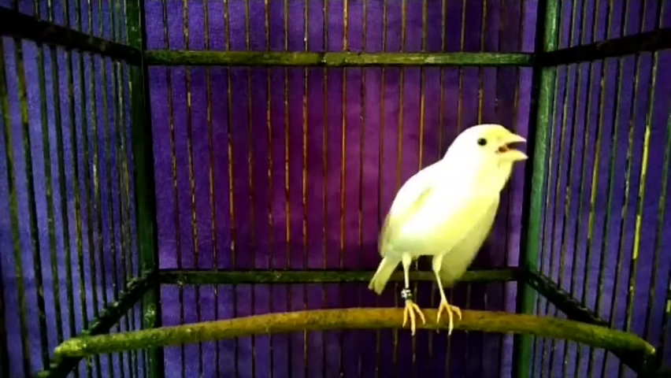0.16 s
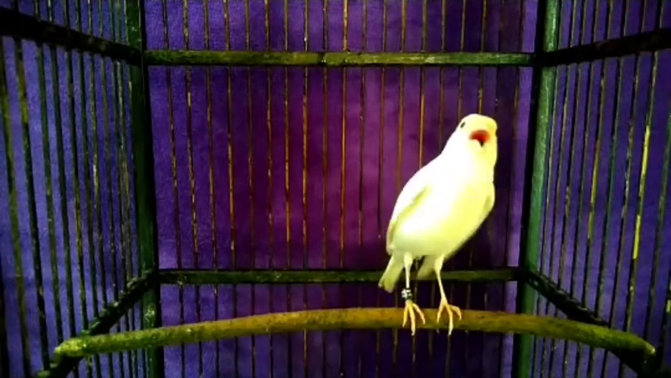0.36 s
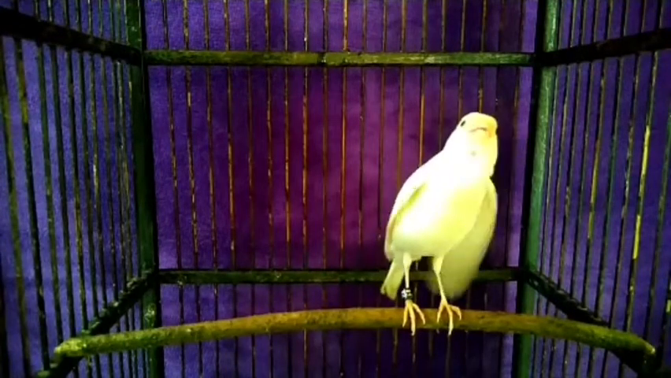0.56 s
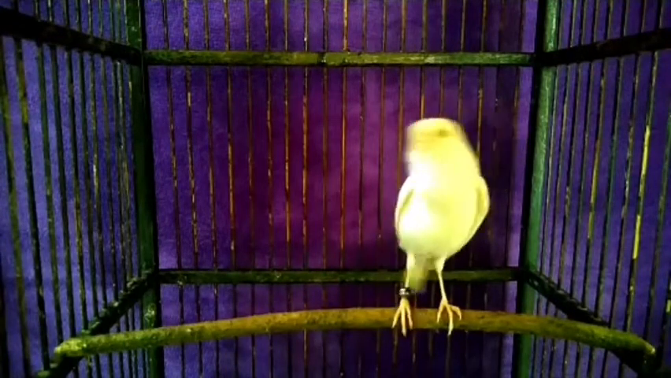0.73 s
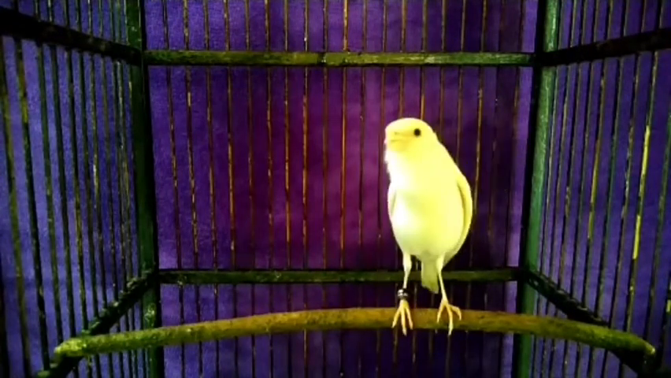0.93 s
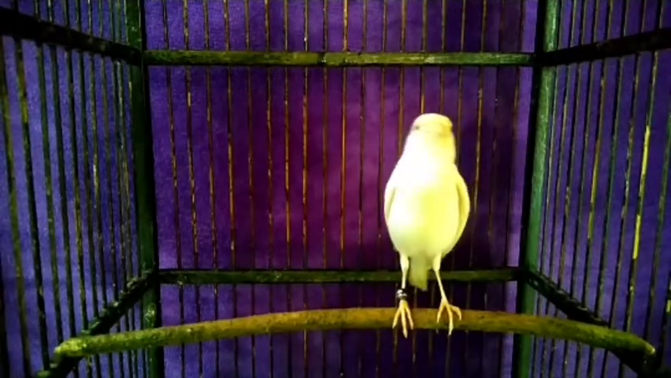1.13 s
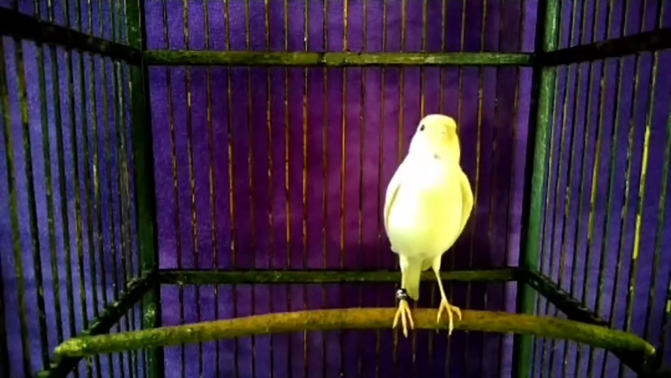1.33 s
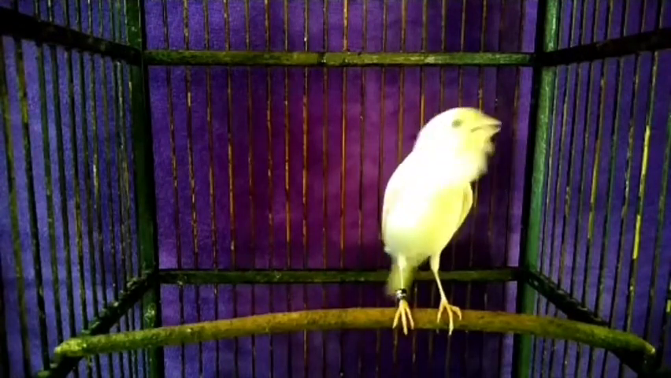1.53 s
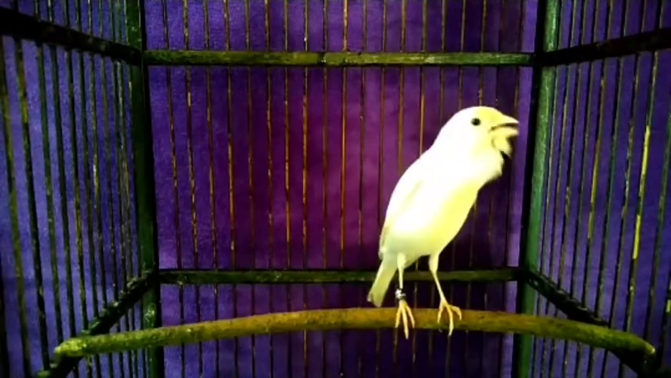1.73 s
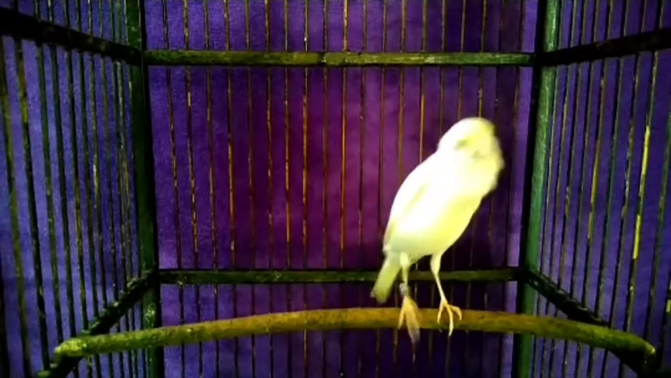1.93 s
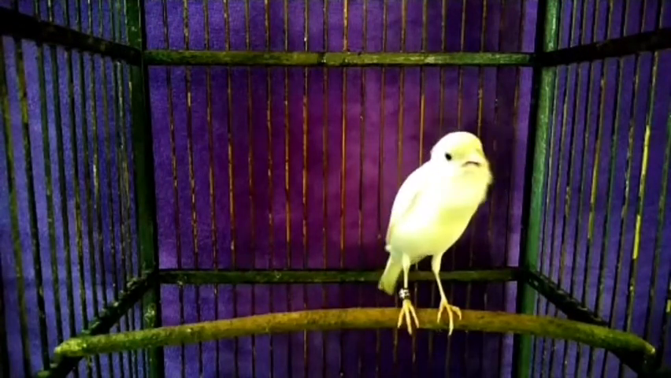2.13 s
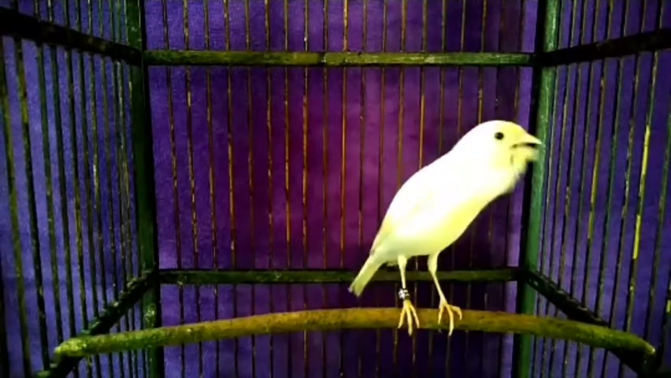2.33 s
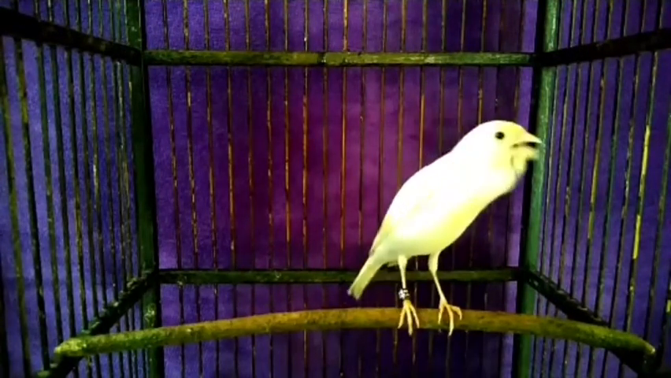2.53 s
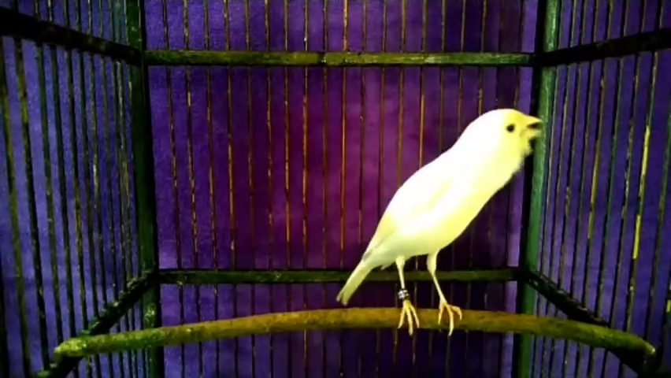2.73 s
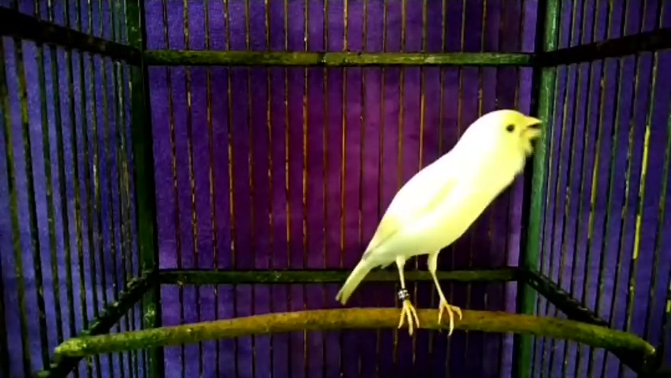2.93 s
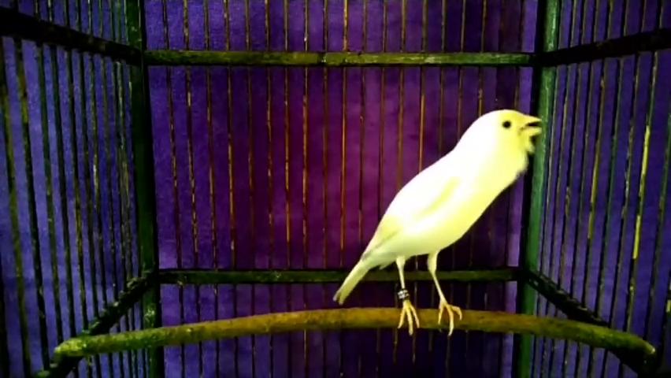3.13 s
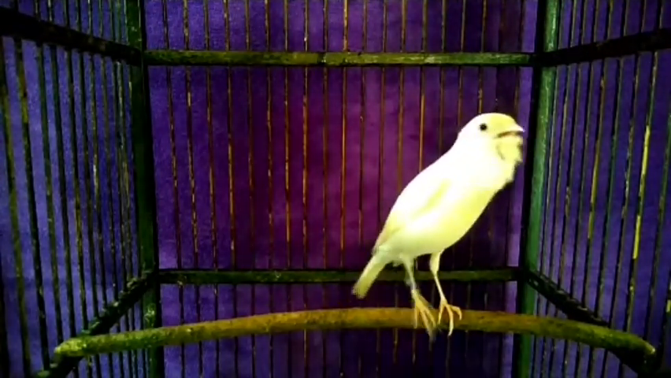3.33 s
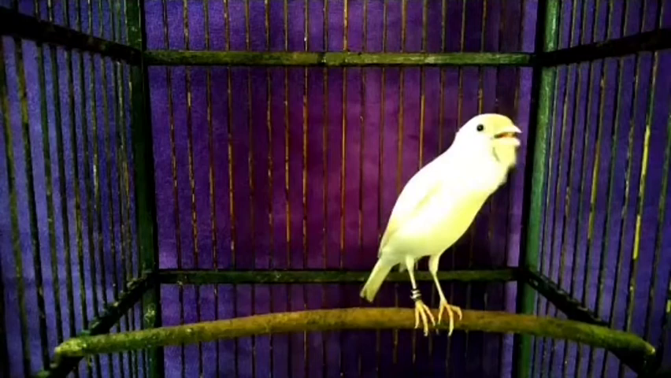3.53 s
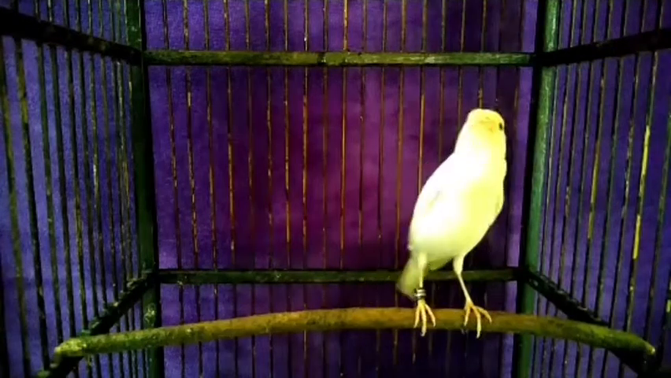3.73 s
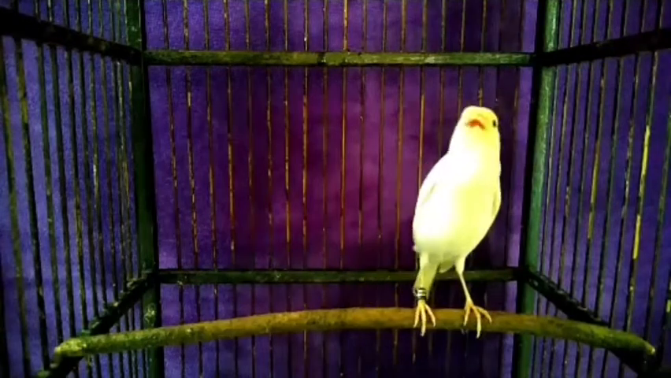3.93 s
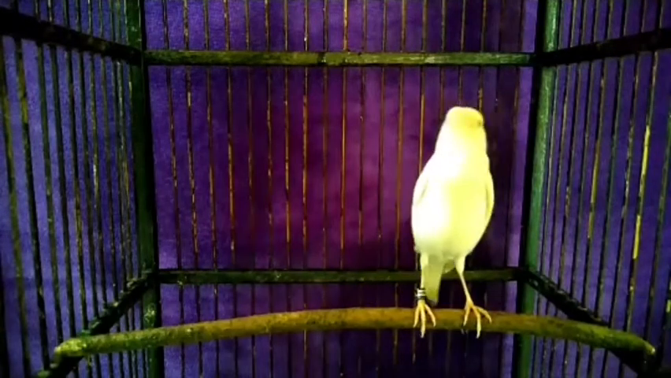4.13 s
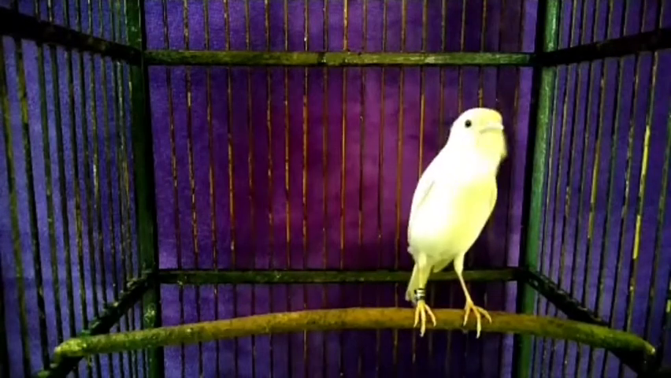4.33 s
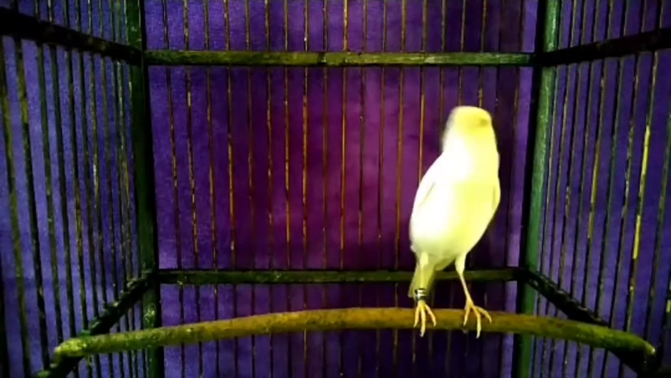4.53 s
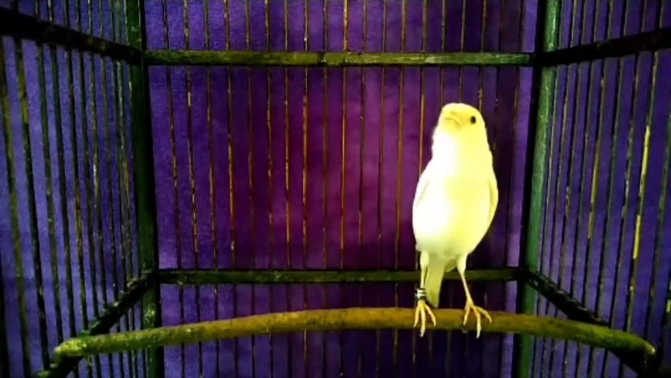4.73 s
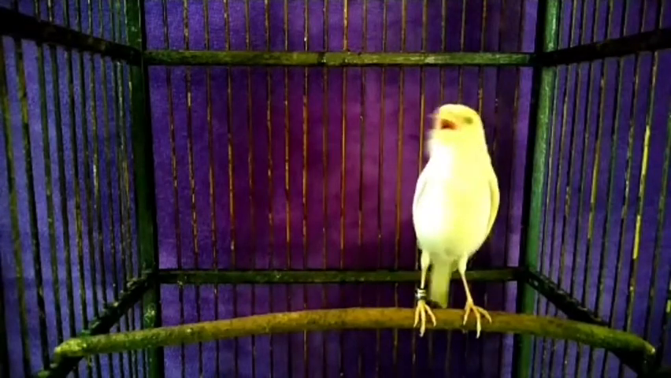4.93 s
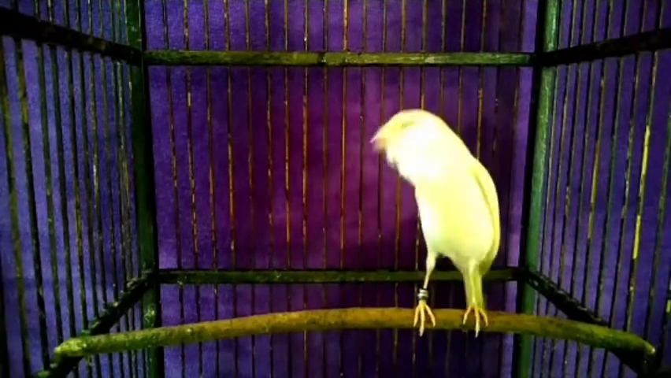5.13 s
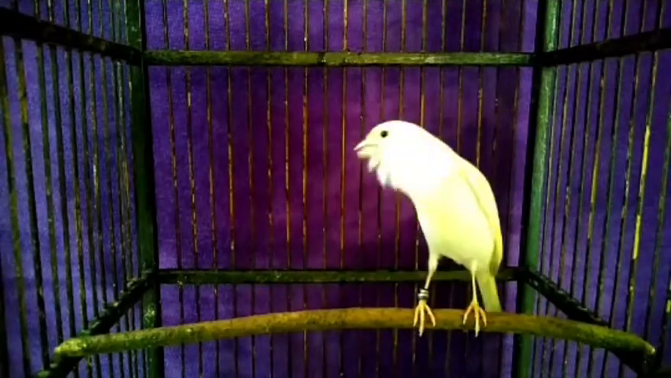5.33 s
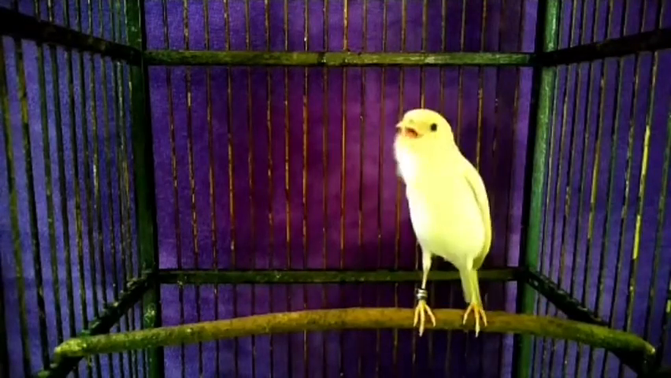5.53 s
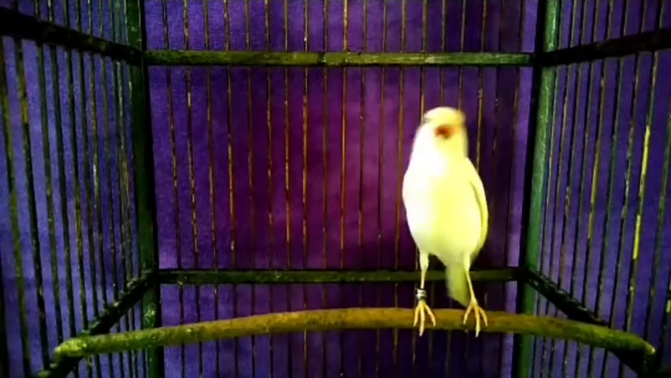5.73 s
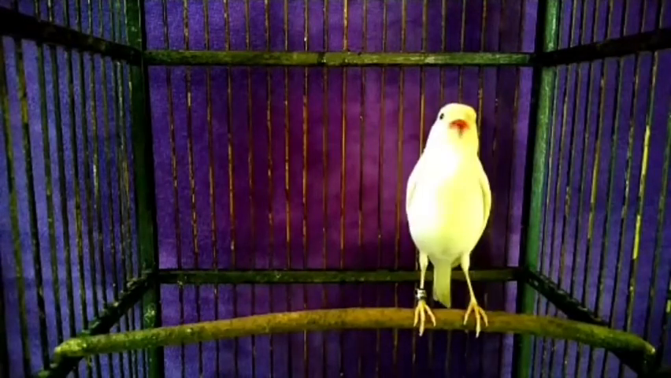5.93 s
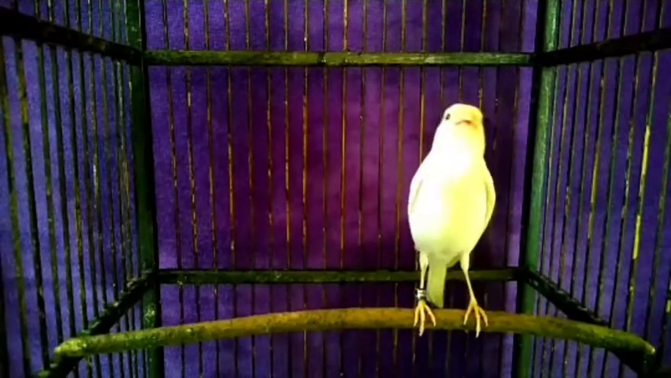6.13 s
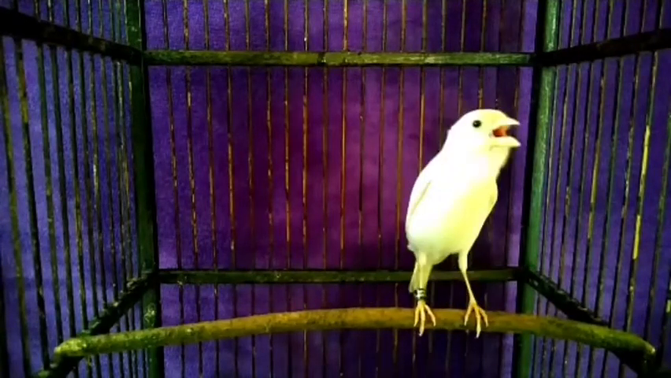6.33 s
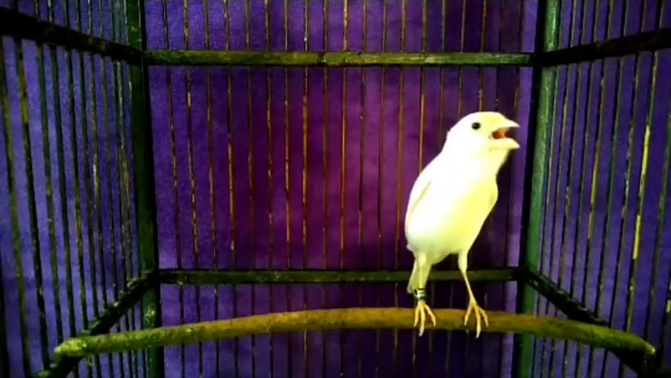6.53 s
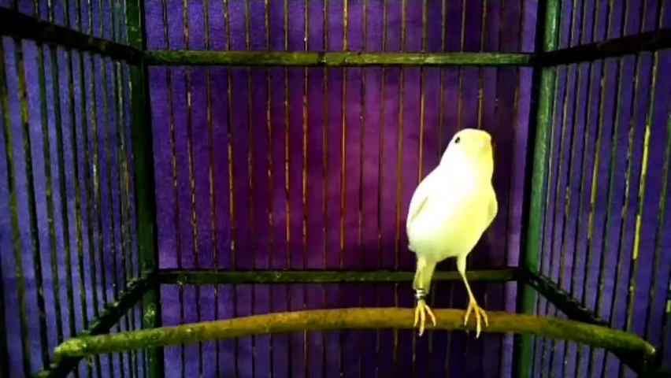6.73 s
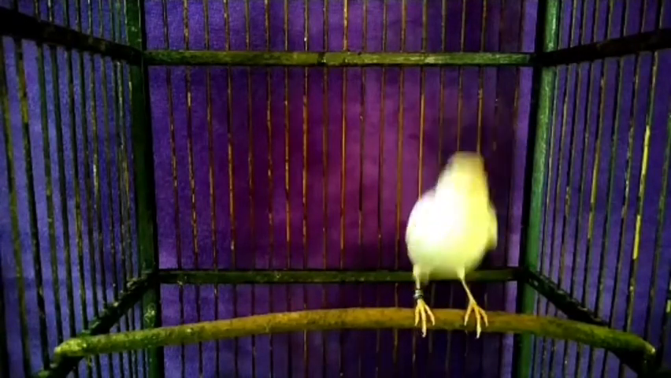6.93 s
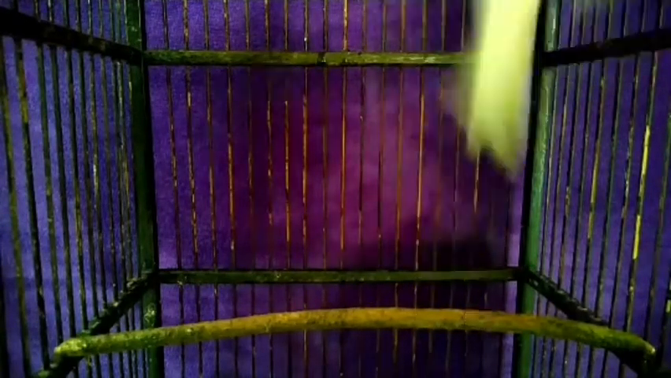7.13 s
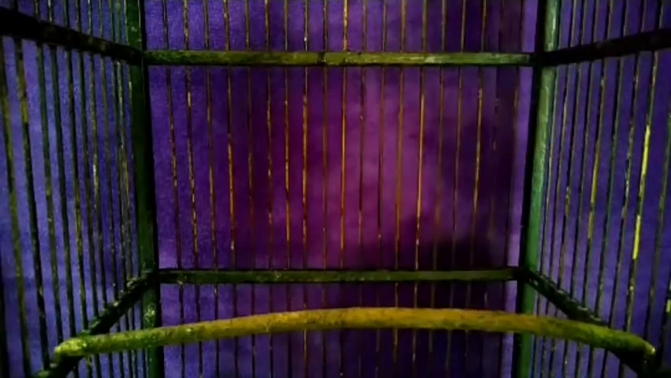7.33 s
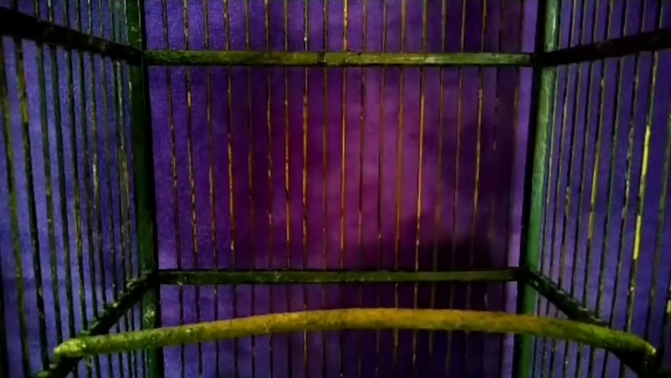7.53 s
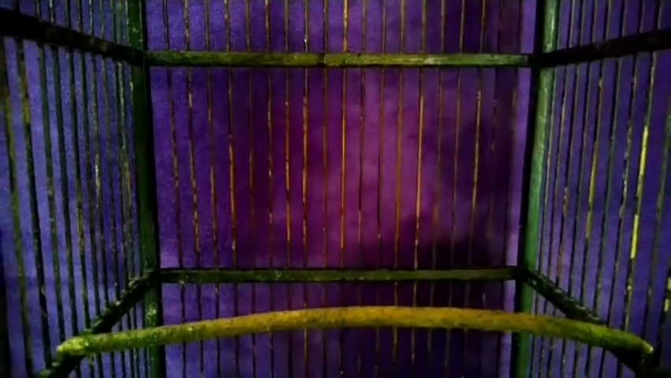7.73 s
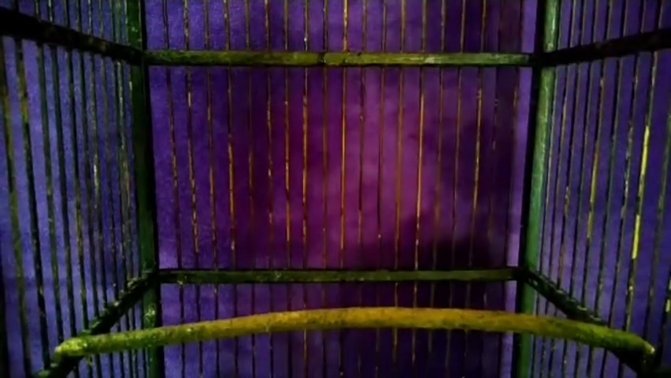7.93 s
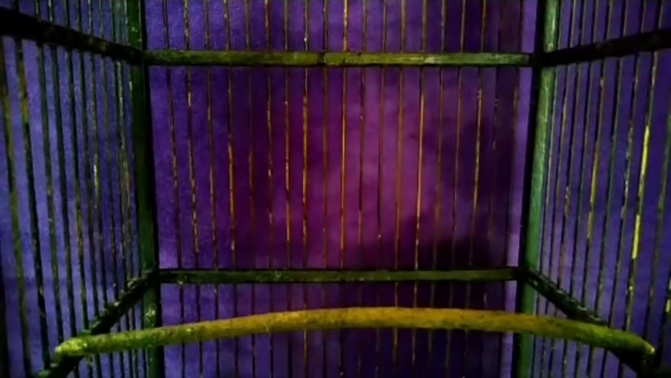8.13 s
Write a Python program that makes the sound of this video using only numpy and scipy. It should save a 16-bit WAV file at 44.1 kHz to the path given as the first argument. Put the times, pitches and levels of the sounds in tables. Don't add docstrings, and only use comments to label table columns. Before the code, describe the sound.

In a small, hard-walled room, a caged canary pours out an almost unbroken bright song, changing from low rolls to wide downward sweeps, flicks with deep drops, and very high falls. Close, slightly overloaded sound with short reflections. A brief pause, then a low flutter, thin metallic wire strikes, and near silence with faint far chirps.

```python
import sys
import numpy as np
from scipy import signal
from scipy.fft import rfft, irfft, next_fast_len
from scipy.io import wavfile
from scipy.ndimage import uniform_filter1d

SR = 44100
rng = np.random.default_rng(int(sys.argv[2]) if len(sys.argv) > 2 else 0)


def boost_factor(decibels):
    exponent = np.asarray(decibels, float) / 20
    return 10 ** exponent


def generate_wav(sig):
    pcm = np.round(np.clip(np.atleast_2d(sig).T, -1, 1) * 32767).astype(np.int16)
    wavfile.write(sys.argv[1], SR, pcm)


N = 364707
T = np.arange(N) / SR

# f/Hz, density/dB
AIR = [(15, -32), (25, -15), (104, -4.5), (193, -13), (305, -7), (349, -9.5), (684, -14.5), (1170, -18),
       (1800, -19.5), (2300, -24), (15500, -28)]
AIR_DB = -56

# t/s from the start, f/Hz, level/dB
CHIP = [(0, 4233, -7), (.003, 4766, -1.14), (.009, 4479, -7), (.015, 4627, -7), (.024, 4486, -14)]
JAB = [(0, 4301, -18), (.004, 5625, -20), (.009, 5870, 0), (.019, 5705, -6.5)]
HOLD = [(0, 2620, -28.5), (.017, 2580, -18.5), (.035, 2489, -9), (.075, 2528, -16.5), (.115, 2510, -14),
        (.14, 2558, -21), (.164, 2523, -32.5)]
FALL = [(0, 6830, -13), (.005, 4925, -5.5), (.01, 3543, -10), (.017, 2906, -12), (.026, 2824, -14.5)]
PIP = [(0, 3495, -27), (.008, 3575, -7), (.019, 3560, -9)]
# t/s, length/s, level/dB
SUNG = [
    (CHIP, [(-.009, 0.0215, -5.5), (.158, 0.016, 0), (.345, 0.029, 3)]),
    (JAB, [(1.311, 0.0166, 2.5)]),
    (HOLD, [(1.358, 0.13, -1.26)]),
    (FALL, [(6.318, 0.02666, 1.21)]),
    (PIP, [(6.484, 0.0172, 2)]),
]
# t/s, f/Hz, level/dB
SOARS = [
    [(.017, 5280, -23.5), (.024, 5900, -27), (0.034, 6707, -14), (0.046, 7044, -9.5), (0.084, 7590, -5),
     (0.096, 7585, -16.5), (0.106, 7558, -0.5), (0.118, 7562, -16.5), (0.126, 7612, -33)],
    [(0.19, 5343, -23), (0.206, 5900, -24.5), (0.214, 6637, -12), (0.22, 6996, -5), (0.234, 7233, -15.5),
     (.262, 7410, -2.5), (0.276, 7493, -10.5), (0.3, 7582, -6), (0.315, 7350, -28)],
    [(0.378, 5309, -25), (0.392, 5722, -28.5), (0.404, 6811, -6), (0.424, 7077, -23), (0.432, 7250, -7),
     (0.454, 7490, -8), (0.486, 7478, -4), (0.494, 7499, -13.5), (0.505, 7638, -31)],
    [(6.208, 4563, -18), (6.217, 5036, -4), (6.232, 5150, -12), (6.241, 5900, -1.5), (6.25, 6463, -13),
     (6.257, 6685, -2), (6.272, 6942, -4), (6.308, 6747, -8), (6.317, 6787, -21)],
    [(6.346, 4012, -35.5), (6.356, 4510, -22), (6.363, 4814, -3), (6.378, 5243, -11.5), (6.385, 5900, -4.5),
     (6.401, 6853, -6), (6.41, 7198, -15), (6.427, 6933, -0.5), (6.442, 7034, -12)],
    [(6.501, 4252, -20.5), (6.51, 4385, -16), (6.518, 4848, -3), (6.528, 4957, -4.5), (6.536, 5255, -10),
     (6.554, 6816, -8.5), (6.578, 7114, -7.5), (6.59, 6758, -8.5), (6.597, 6813, -12)],
]
SOAR_DB, WHISTLE_DB, WHISTLE_FLUTTER_DB = 3.0, 1.785, 0.6
WAVER = 0.003
WHISTLE_ROOM_DB = -0.5

OVERTONES_DB = [-25.5, -28.5, -50, -41.5]
# f/Hz, gain/dB
BEAK = [(4500, -13), (6000, -15.5), (6900, 1.5), (7900, -15.5), (9200, 1.5), (10600, -2.5), (12000, -6),
        (14500, -8)]
RASP_RAD = 0.05
WANDER_RAD = np.cumsum(RASP_RAD * rng.standard_normal(N))
# f/Hz, level/dB
HISS = [(3000, -41.0), (6500, -14.5), (9000, 26.5), (11000, 14.0), (13000, -3.0), (15500, -10.5)]
BREATH_DB = -35

# t/s, level/dB
ECHOES = [
    (.0006, -39),
    (.0031, -13),
    (.0074, -14),
    (0.0138, -20.5),
]
ROOM_DB, ROOM_T60_S, ROOM_DULL_HZ, ROOM_GAP_S = -10.5, 0.296, 12104, 0.008
LINGER_DB, LINGER_T60_S = -19, 0.5

# t/s, length/s, start f/Hz, end f/Hz, level/dB
FAR = [(.003, 0.035, 770, 756, -32.5), (0.373, .04, 767, 746.6, -43.5), (6.752, 0.012, 944, 920, -55.5),
       (6.768, 0.019, 402.2, 396, -47), (7.262, .115, 689, 708.8, -37.5), (7.337, 0.019, 972, 976, -47),
       (7.621, 0.042, 820, 851.6, -46.5), (7.727, 0.015, 831.3, 799, -42),
       (7.915, 0.062, 923.7, 924.4, -47.5), (8.007, 0.015, 670, 635.5, -50.5),
       (7.654, 0.08, 3000, 2950, -55), (7.658, 0.065, 2750, 2730, -51), (7.756, 0.079, 2650, 2620, -55.5),
       (8.131, 0.1, 3300, 3307, -39.5), (8.151, 0.15, 3560, 3410, -47), (8.161, 0.15, 3720, 3728, -48),
       (8.22, .05, 4000, 4060, -55.5)]
SHAKE = 0.02
WARBLE_PER_S, WARBLE_MOST = 16, 1

# t/s, level/dB
ROLL = [(.5617, -14.5), (.5898, -5.5), (.6245, -4.5), (.6583, -7.5), (.6957, -6.5), (.7341, -6.5),
        (.7723, -6.5), (.8115, -5.5), (.8517, -7.5), (.8964, -6.5), (.9399, -7), (.9831, -9.5),
        (1.0244, -6.5), (1.067, -6.5), (1.113, -6.5), (1.1562, -7.5), (1.2035, -9.5)]
SWEEP = [(1.5608, -11.5), (1.6250, -7), (1.6885, -6.5), (1.7538, -9), (1.8170, -6), (1.883, -4.5),
         (1.9488, -5), (2.0133, -7), (2.0775, -5.5), (2.1415, -5.5), (2.2069, -7), (2.2726, -5.5),
         (2.3390, -8), (2.4044, -5.5), (2.4693, -5.5), (2.5347, -7), (2.602, -9)]
FADING = [(2.6690, -8.5), (2.7370, -7), (2.803, -8), (2.8690, -8), (2.9390, -6.5), (3.0107, -7.5),
          (3.0782, -7.5), (3.1480, -8.5), (3.2200, -7), (3.2920, -9.5), (3.3680, -8.5), (3.4422, -11)]
FLICK = [(3.2147, -7), (3.3619, -6), (3.4385, -3), (3.5172, -8), (3.5928, -9), (3.6697, -8), (3.748, -10),
         (3.8278, -9.5), (3.9071, -11), (3.9864, -10), (4.0690, -6), (4.1521, -11.5), (4.2374, -7),
         (4.3320, -8.5), (4.4259, -9), (4.5182, -3), (4.6122, -8.5), (4.7153, -12), (4.819, -12),
         (4.9408, -18), (5.0705, -15.5)]
SPARK = [(3.674, -13.5), (3.831, -24), (3.911, -28), (3.99, -21), (4.073, -18), (4.156, -16.5),
         (4.242, -11.5), (4.336, -11.5), (4.429, -11), (4.521, -14.5), (4.616, -15), (4.719, -23)]
SLIDE = [(3.524, -16), (3.600, -13.5), (3.677, -15), (3.755, -13), (3.835, -14.5), (3.914, -16.5),
         (3.993, -12.5), (4.076, -15.5), (4.159, -13.5), (4.244, -12), (4.339, -7.5), (4.432, -6),
         (4.525, -13), (4.620, -11.5)]
LONG = [
    (4.7278, -6),
    (4.842, -3),
    (4.9617, -4.5),
    (5.0870, -8),
]
DROP = [(3.483, -7.5), (3.5592, -5), (3.6352, -5), (3.7135, -6.5), (3.7915, -7), (3.872, -6.5), (3.951, -7),
        (4.031, -7), (4.115, -6), (4.199, -6), (4.288, -6), (4.3815, -5.5), (4.4755, -5), (4.569, -6),
        (4.671, -7.5), (4.776, -8)]
HIGH = [
    (5.2027, -4.5),
    (5.3155, -6),
    (5.4250, -2),
    (5.5324, -3),
    (5.6428, -5),
    (5.7535, -3.5),
    (5.8620, -3.5),
    (5.9756, -5),
    (6.0885, -4.5),
]
LOW = [(4.891, -8), (5.016, -5.5), (5.144, -6), (5.2575, -9.5), (5.3704, -9), (5.4818, -6.5), (5.5908, -7),
       (5.7002, -8), (5.8088, -6), (5.922, -8.5), (6.0306, -9.5), (6.1432, -9.5)]
# t/s, length/s, start f/Hz, end f/Hz
ROLL_DRIFT = [(0.552, 0.00936, 3136, 2040), (0.59, 0.0083, 3570, 2231), (0.638, 0.0123, 3729, 1979),
              (0.722, .0175, 3734, 2000), (1.204, 0.02108, 3778, 1948)]
SWEEP_DRIFT = [(1.56, 0.03767, 5849, 3420), (1.75, 0.037, 5942, 3468), (2.53, .039, 5910, 3511)]
FADING_DRIFT = [(2.673, 0.0396, 5970, 3450), (2.8, 0.0389, 5872, 3315), (3.08, 0.0444, 5772, 3451),
                (3.148, 0.0396, 6341, 3428), (3.218, .042, 5748, 3406), (3.441, 0.0424, 5824, 3355)]
FLICK_DRIFT = [(3.211, 0.00917, 4103, 4800), (3.439, 0.01706, 4429, 4720), (3.521, 0.01413, 4120, 4900),
               (3.75, 0.0173, 3576, 4950), (4.24, 0.01524, 4000, 5000), (4.43, 0.0159, 4110, 5000),
               (4.52, 0.0182, 4303, 4950), (4.608, 0.0151, 4296, 5000), (4.715, .011, 4300, 5000),
               (4.82, 0.01414, 4650, 5200), (4.938, 0.0149, 5130, 5900), (5.07, 0.01085, 4670, 5280)]
SPARK_DRIFT = [(3.7, 0.012, 5950, 5120), (4.7, .014, 5950, 5260)]
SLIDE_DRIFT = [(3.53, 0.0244, 5018, 3517), (3.76, 0.0274, 5040, 3605), (4., 0.0253, 4955, 3680),
               (4.17, 0.0293, 5047, 3585), (4.43, 0.035, 5030, 3459), (4.525, 0.035, 5093, 3508),
               (4.62, 0.0465, 5025, 3586)]
LONG_DRIFT = [(4.73, 0.0571, 5176, 3152), (4.84, 0.0441, 5752, 3350), (4.958, 0.051, 6186, 3365),
              (5.089, 0.0587, 5876, 3408)]
DROP_DRIFT = [(3.48, 0.02196, 2968, 1392), (3.62, 0.01857, 2943, 921), (3.8, 0.01954, 2846, 918),
              (4.38, .018, 2790, 926.4), (4.768, 0.02083, 2800, 990.5)]
HIGH_DRIFT = [(5.2, 0.0458, 7718, 4863), (5.42, 0.0438, 8098, 4982), (5.858, .049, 7834, 4900),
              (6.092, 0.0477, 7800, 4892)]
LOW_DRIFT = [(4.89, 0.0197, 3250, 1776), (5.02, 0.01305, 3463, 1858), (5.14, 0.01688, 3421, 1990),
             (5.26, 0.01477, 3376, 2150), (5.59, .016, 3400, 2324), (5.92, 0.0183, 3439, 2229),
             (6.14, 0.01695, 3290, 2062)]
HELD, SHORT, RISING = FLICK[:3], FLICK[3:18], FLICK[18:]
# notes, drift, glide/share, effort/dB
PHRASES = [
    (ROLL, ROLL_DRIFT, (.03, .18, .32, .43, .51, .59, .76, .97, 1.05), (-8.5, -3, 0.7, 7.5, 8, 6, 3, -4.5, -8.5)),
    (SWEEP, SWEEP_DRIFT, (-.02, .2, .37, .53, .66, .78, .92, 1.02, 1.0524), (2.5, 8.5, 5.5, 6.5, 2.13, 3, 6, 6, -3.5)),
    (FADING, FADING_DRIFT, (-.03, .15, .33, .51, .65, .8, .92, .99, 1.02), (-0.5, 7, 3, 5.5, 6.5, 2.5, -4, 0, -10)),
    (HELD, FLICK_DRIFT, (.01, 0.82, 1.1, 1.1, 2, 0.79, 1.1), (2.5, 7.5, 6, -3.5, -4.5, -1, -12)),
    (SHORT, FLICK_DRIFT, (.01, 0.7, 0.938, 0.8, 0.768, 1, 0.85), (19, 8.5, 5.5, -13.5, -4, -12.5, -20.5)),
    (RISING, FLICK_DRIFT, (.01, .3, 0.519, .7, 0.852, .95, 1.01), (-13.5, -2.5, 6.5, 2, 7.05, 2.5, -18)),
    (SPARK, SPARK_DRIFT, (.01, .3, .6, .99), (-11.5, 5, -4, -13)),
    (SLIDE, SLIDE_DRIFT, (.01, .04, .12, .24, .4, .55, .7, .85, .99), (-4, 0, -2, -2, -5.5, 4.5, 5.5, 11, -6.5)),
           (LONG, LONG_DRIFT, (.01, .08, .23, .38, .49, .56, .71, .85, .99), (-10.5, 1, -7.5, 4.5, 5, 9, -12, -14.5, -18.5)),
    (DROP, DROP_DRIFT, (.01, .03, .04, .08, .36, .52, .72, .87, .99), (-21, 3, 5, 7, 2, 3.5, -13.5, -12.5, -34)),
    (HIGH, HIGH_DRIFT, (0.012, .1, .18, .32, .44, 0.672, 0.899, .98, 1.01), (-18.5, -2, -7.5, 12, 5, -12, -5.5, 7, -7.5)),
    (LOW, LOW_DRIFT, (.02, .1, .2, .3, .39, .52, .8, 1.1, 1.35), (-10, 4.5, 4, 6, 9, 0, -0.5, -5.5, -19.5)),
]
# f/Hz, gain/dB
PERCH = [(1500, -2), (2050, 2.5), (2380, -4.5), (2850, 1), (3450, 1.5), (4150, -0.5), (4900, 1), (6100, -1)]
SCATTER = 0.009
ROOM_SHARE = 0.67
FLUTTER_DB = 2

# t/s, level/dB, wire set
TICKS = [
    (7.044, -57, 3),
    (7.056, -52, 0),
    (7.076, -50, 4),
    (7.095, -58, 5),
    (7.176, -55, 6),
    (7.228, -40, 1),
    (7.262, -47, 7),
    (7.478, -42, 2),
    (7.845, -61, 4),
]
# f/Hz, level/dB, t60/s
WIRES = [
    [(1645, 1, .08), (5900, -0.5, 0.0983), (12000, -11.5, .2)],
    [(4000, -2.5, .35), (5560, -2.5, 0.15), (5950, -7, .05), (6200, -16, .15), (7800, -4, 0.254),
     (8600, -11, .15), (11130, 0, 0.099), (12618, -17, 0.11)],
    [(1820, 6, 0.19), (2336, -2, 0.118), (3800, -13, .1), (5540, -0.5, 0.12), (6875, 0, 0.11),
     (8100, -18.5, .1), (8440, -4, 0.11), (9870, -15, 0.105)],
    [(4950, -1, 0.17)],
    [(2130, -1, 0.13)],
    [(5350, -1, 0.176)],
    [(2000, -1, .15)],
    [(7630, -11.5, .04), (8100, 1.5, 0.057), (8500, 0.5, 0.061)],
]
BUZZ_RAD = 0.045

# t/s, level/dB
WINGS = [
    [(7.05, -65), (7.12, -28.5)],
    [(7.15, -37.5), (7.158, -34), (7.36, -55.5)],
]
# f/Hz, level/dB
PUFF = [(20, -21.0), (50, -5.5), (90, 1.87), (150, -0.5), (300, -21), (1000, -57.0)]
GUST_S, GUST_HZ, GUST_LENGTH_S, GUST_DB = 7.134, 55, 0.011, -21

# f/Hz, level/dB
CRACKLE = [(30, -7), (150, 6.5), (600, -19.0), (3000, -2.0), (9000, 9.0), (15000, -5.0)]
# f/Hz, level/dB
HAZE = [(1500, -21.5), (3300, -5.5), (5300, 0.5), (7000, -2), (8000, -17), (10500, -6.0), (14000, -2.0),
        (15500, -14.0)]
CEILING, KNEE, LOPSIDED, TOP_HZ = 0.87, 25, 0.0021, 14854
RATTLE_DB, APART_DB, HAZE_DB, OUT_DB = -22.5, -11.5, -37.5, -0.55


def shade(points, hz):
    at_hz, db = np.transpose(points)
    return boost_factor(np.interp(np.log(hz), np.log(at_hz), db))


def walk(rate_hz):
    k = int(SR / rate_hz)
    held = np.repeat(rng.standard_normal(N // k + 1), k)
    return 1.2 * uniform_filter1d(uniform_filter1d(held, k), k)[:N]


def colour(points):
    size = next_fast_len(N)
    hz = np.arange(size // 2 + 1) * SR / size + 1
    spectrum = rfft(rng.standard_normal(size)) * shade(points, hz)
    x = irfft(spectrum, size)[:N]
    return x / x.std()


def tone(hz, gain, first=0):
    phase = 2 * np.pi * np.cumsum(hz) / SR
    wander = WANDER_RAD[first:][:len(hz)]
    wave = np.sin(phase)
    for k, db in enumerate(OVERTONES_DB, 2):
        leak = boost_factor(db) * shade(BEAK, k * hz) * (k * hz < SR / 2.2)
        wave = wave + leak * np.sin(k * phase + wander)
    return gain * wave


def room_air():
    return colour(AIR) * boost_factor(AIR_DB + 0.33 * walk(3.7))


def whistles():
    pieces = []
    for shape, sung in SUNG:
        for s, length_s, db in sung:
            held = np.vstack([shape[:-1], (length_s, *shape[-1][1:])])
            pieces.append(held + (s, 0, db))
    pieces += [np.array(soar) + (0, 0, SOAR_DB) for soar in SOARS]
    pieces.sort(key=lambda piece: piece[0][0])
    s, hz, db = np.vstack(pieces).T
    sounding = np.zeros(N)
    for piece in pieces:
        sounding[(T >= piece[0][0]) & (T <= piece[-1][0] + 0.001)] = 1
    gate = uniform_filter1d(uniform_filter1d(sounding, size=60), size=60)
    pitch_hz = uniform_filter1d(np.interp(T, s, hz), size=130) * (1 + WAVER * walk(150))
    level_db = np.interp(T, s, db) + WHISTLE_DB + WHISTLE_FLUTTER_DB * walk(200)
    return tone(pitch_hz, gate * boost_factor(level_db))


def breath(voice):
    return boost_factor(BREATH_DB) * colour(HISS) * uniform_filter1d(np.abs(voice), size=130)


def room(x):
    t = T[:SR]
    decay = boost_factor(-60 * t / ROOM_T60_S) + boost_factor(LINGER_DB - 60 * t / LINGER_T60_S)
    field = rng.standard_normal(SR) * decay * np.clip(t / ROOM_GAP_S - 1, 0, 1)
    field = signal.lfilter(*signal.butter(1, ROOM_DULL_HZ, fs=SR), field)
    field *= boost_factor(ROOM_DB) / np.sqrt(np.sum(field ** 2))
    for s, db in ECHOES:
        field[int(s * SR)] += boost_factor(db)
    return signal.fftconvolve(x, field)[:N]


def far_birds():
    out, shake, throb = np.zeros(N), walk(260), walk(90)
    for s, length_s, start_hz, end_hz, db in FAR:
        warble = min(WARBLE_PER_S * length_s, WARBLE_MOST)
        u = (T - s) / length_s
        on = (u > 0) & (u < 1)
        u = u[on]
        hz = (start_hz + (end_hz - start_hz) * u) * (1 + SHAKE * warble * shake[on])
        envelope = np.minimum(u / 0.11, 1) * (1 - u) ** 0.13
        out[on] += tone(hz, boost_factor(db + 3.2 * warble * throb[on]) * envelope)
    return out


def trills():
    out = np.zeros((2, N))
    for notes, drift, glide, effort_db in PHRASES:
        steps = np.linspace(0, 1, len(glide))
        drift_s, *columns = np.transpose(drift)
        luck = 1 + SCATTER * rng.standard_normal((len(notes), 2))
        for (s, db), (start_luck, end_luck) in zip(notes, luck):
            length_s, start_hz, end_hz = (np.interp(s, drift_s, column) for column in columns)
            start_hz, end_hz = start_hz * start_luck, end_hz * end_luck
            u = np.arange(int(length_s * SR)) / (length_s * SR)
            share = uniform_filter1d(np.interp(u, steps, glide), size=60, mode="nearest")
            hz = np.maximum(start_hz + (end_hz - start_hz) * share, 300)
            ramp = np.clip(np.minimum(u, 1 - u) * length_s / 0.0023, 0, 1)
            edge = np.sin(np.pi / 2 * ramp) ** 2
            swell_db = np.outer([1, ROOM_SHARE], np.interp(u, steps, effort_db))
            gain = edge * boost_factor(db + swell_db) * shade(PERCH, hz)
            first = int(s * SR)
            out[:, first:][:, :len(u)] += tone(hz, gain, first)
    return out


def cage():
    out, t = np.zeros(N), T[:SR // 4]
    for s, db, which in TICKS:
        wobble = np.cumsum(BUZZ_RAD * rng.standard_normal(len(t)))
        ring = np.zeros(len(t))
        for hz, wire_db, t60_s in WIRES[int(which)]:
            strike_db = wire_db + 1.293 * rng.standard_normal()
            ring += boost_factor(strike_db - 60 * t / t60_s) * np.sin(2 * np.pi * hz * t + wobble)
        crack = 0.1 * np.diff(rng.standard_normal(len(t) + 1)) * np.exp(-t / 0.005)
        out[int(s * SR):][:len(t)] += boost_factor(db) * (ring / np.abs(ring).max() + crack)
    return out


def wings():
    s, db = np.vstack(WINGS).T
    puffs = colour(PUFF) * boost_factor(np.interp(T, s, db, -120, -120))
    t = T - GUST_S
    push = np.exp(-(t / GUST_LENGTH_S) ** 2) * np.cos(2 * np.pi * GUST_HZ * t - 0.6)
    return puffs + boost_factor(GUST_DB) * push


def scene():
    voice = trills() * boost_factor(FLUTTER_DB * walk(200)) + whistles() * boost_factor([[0], [WHISTLE_ROOM_DB]])
    bird, spread = voice + breath(voice)
    others = far_birds() + cage()
    mix = bird + 1.18 * others + room(spread + others) + wings() + room_air()
    return np.tile(mix, (2, 1))


def top_cut(x):
    return signal.sosfilt(signal.butter(12, 15680, fs=SR, output="sos"), x)


def record(dry):
    x = dry + LOPSIDED * (np.clip(dry, -2, 2) ** 2 - 0.02)
    x = x / (1 + np.abs(x / CEILING) ** KNEE) ** (1 / KNEE)
    excess = uniform_filter1d(np.minimum(np.abs(dry - x), 0.4), size=200)
    crackle = colour(CRACKLE) + boost_factor(APART_DB) * rng.standard_normal(dry.shape)
    x = x + excess * boost_factor(RATTLE_DB) * crackle
    haze_gain = boost_factor(HAZE_DB + 2.5 * walk(51)) * uniform_filter1d(np.abs(x), size=900)
    x = x + haze_gain * colour(HAZE)
    low_pass = signal.ellip(8, 0.2, 60, TOP_HZ, fs=SR, output="sos")
    x = boost_factor(OUT_DB) * signal.sosfilt(low_pass, x)
    return top_cut(x)


dry = scene()
out = record(dry)
generate_wav(out)
```